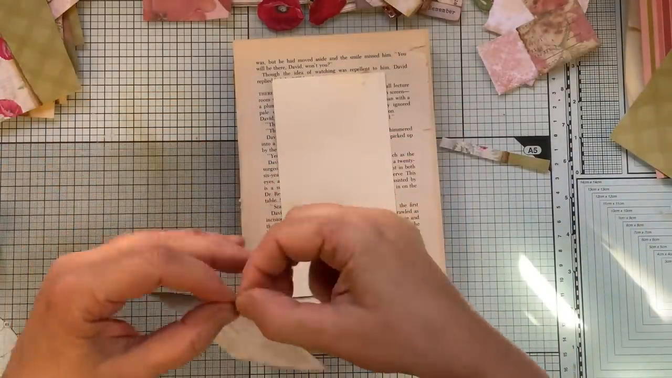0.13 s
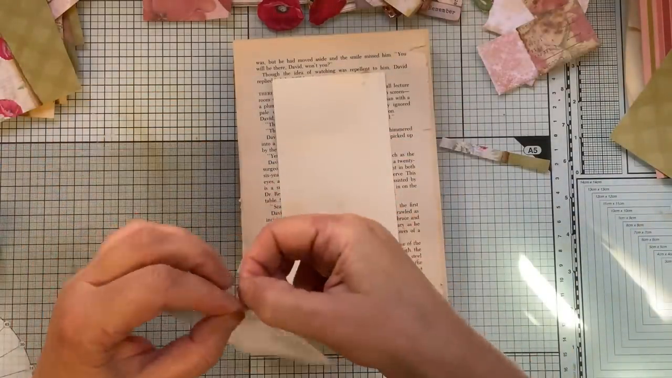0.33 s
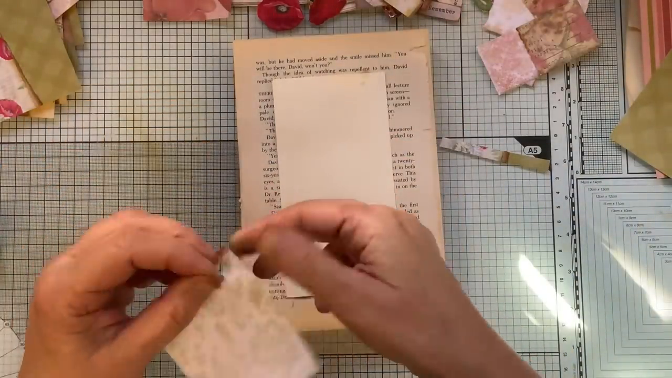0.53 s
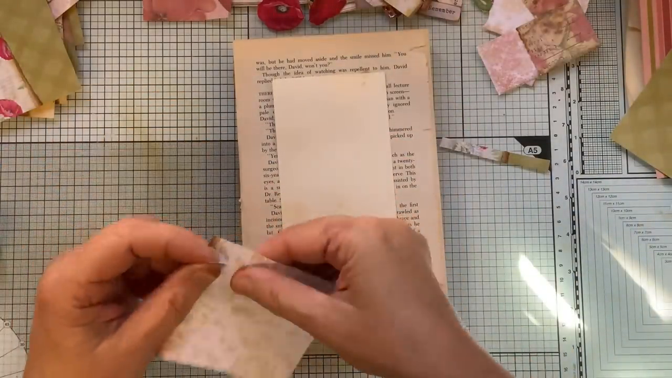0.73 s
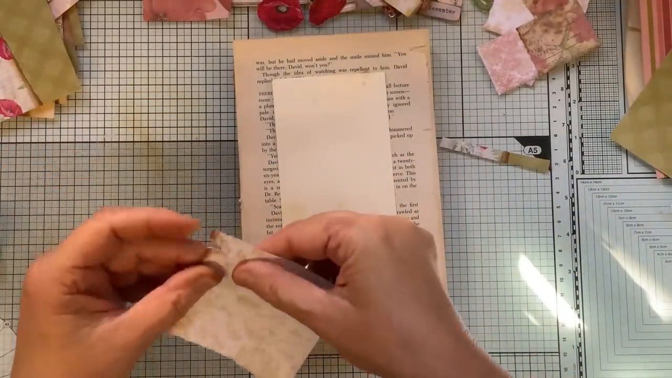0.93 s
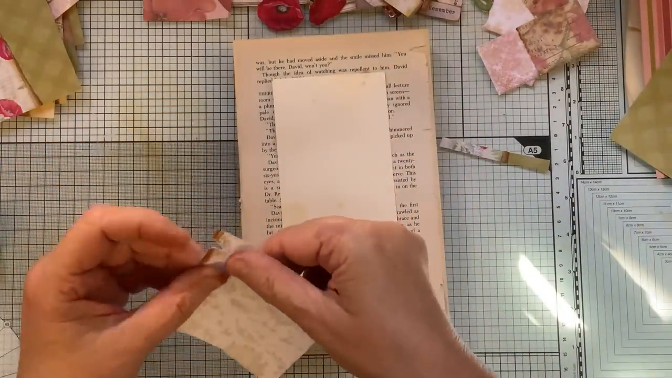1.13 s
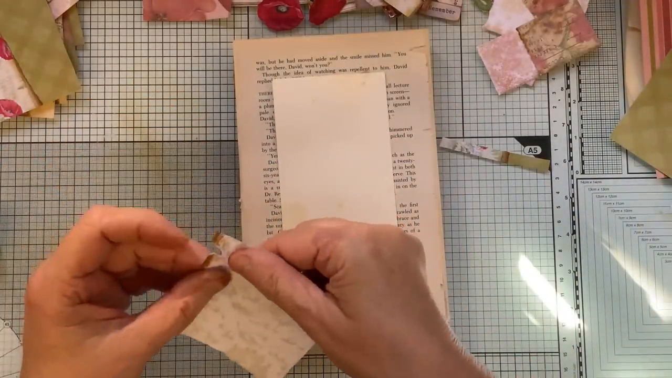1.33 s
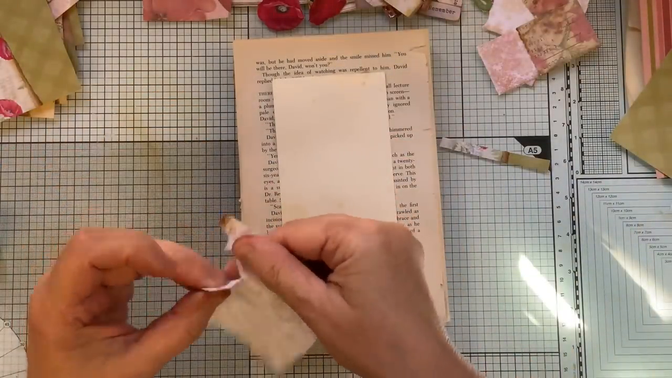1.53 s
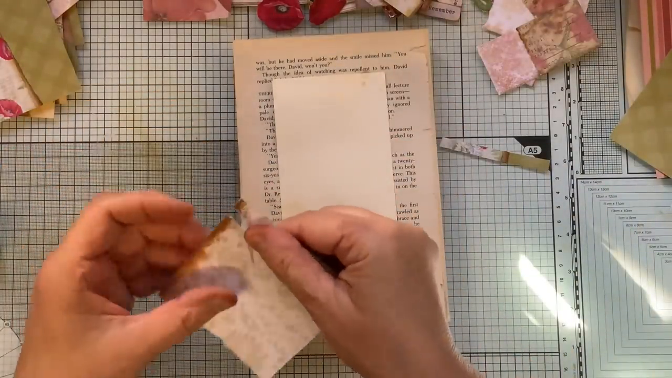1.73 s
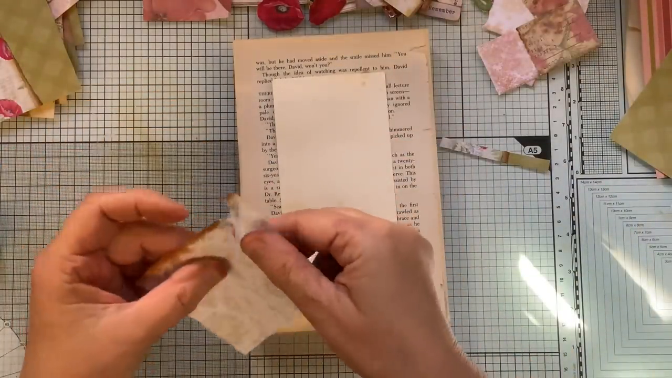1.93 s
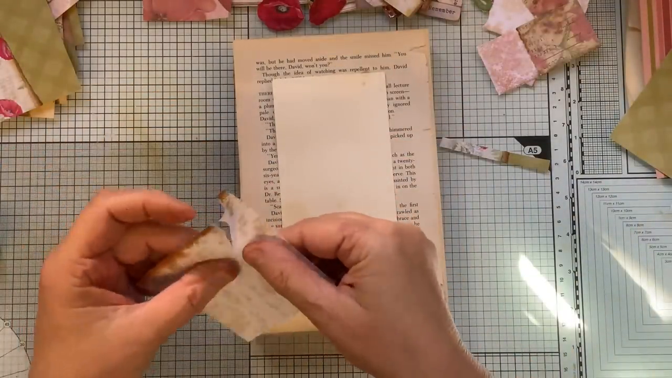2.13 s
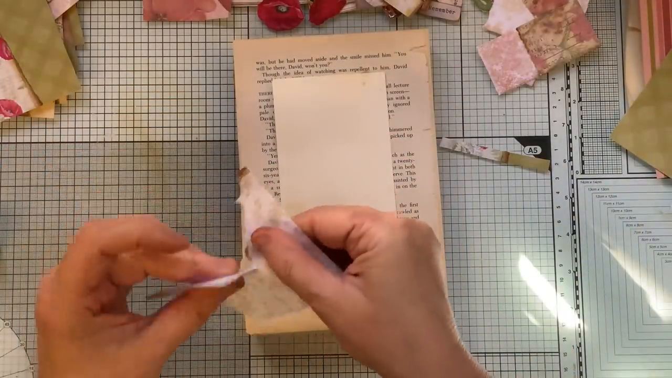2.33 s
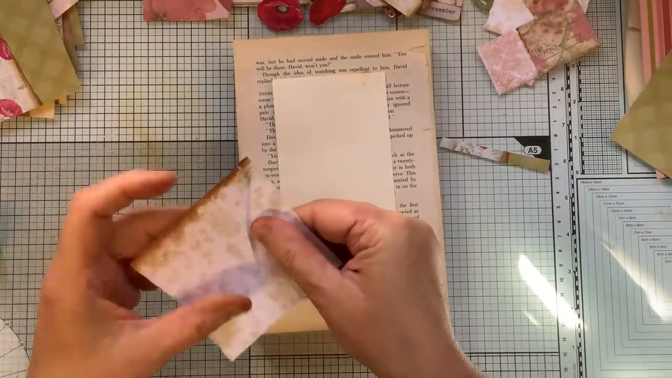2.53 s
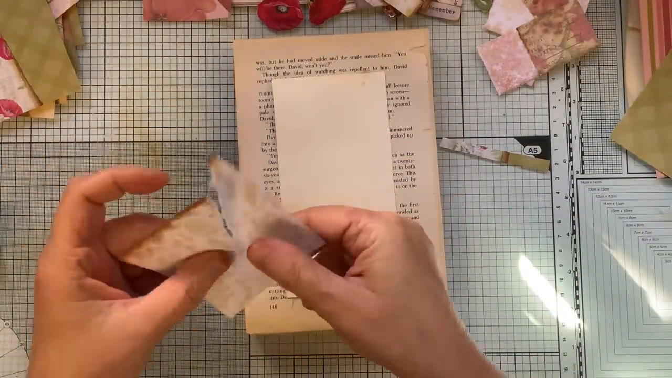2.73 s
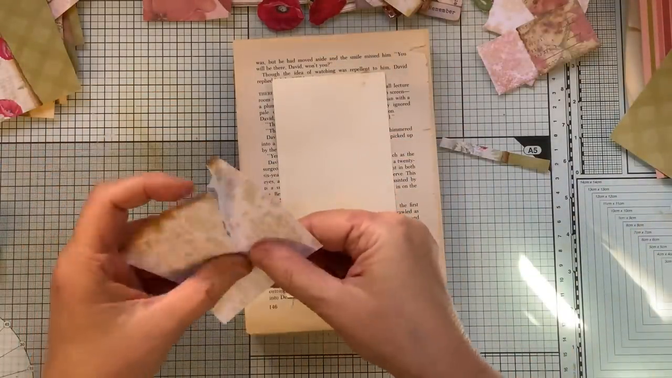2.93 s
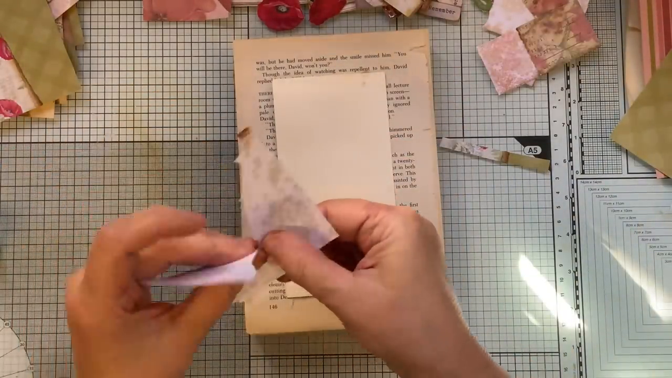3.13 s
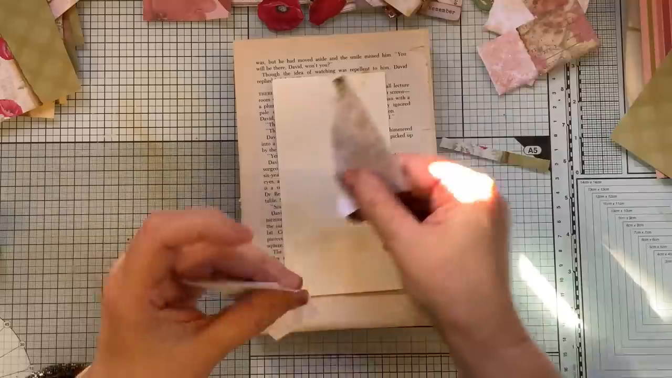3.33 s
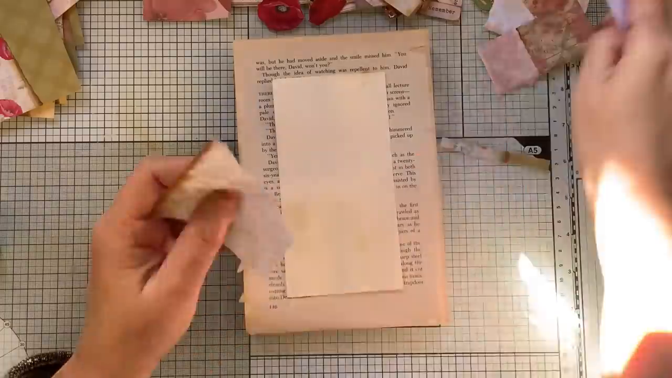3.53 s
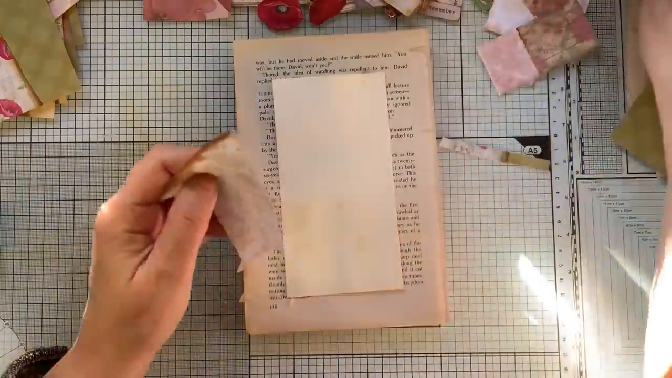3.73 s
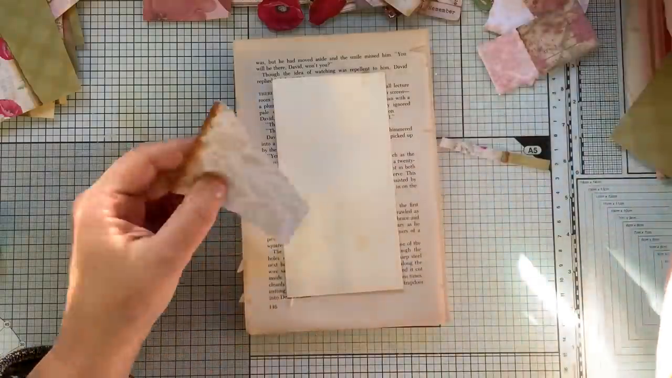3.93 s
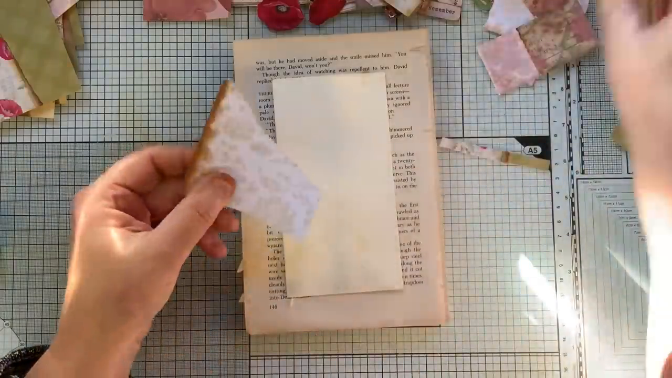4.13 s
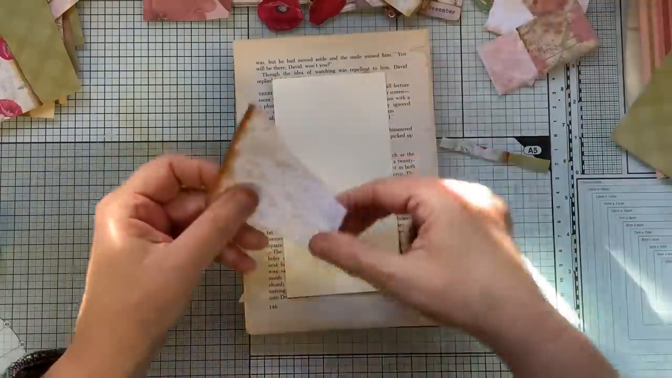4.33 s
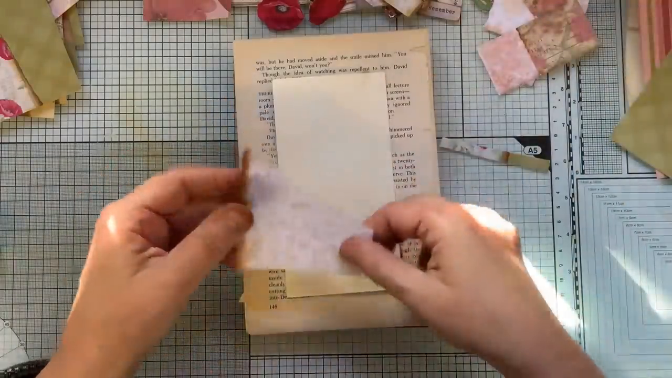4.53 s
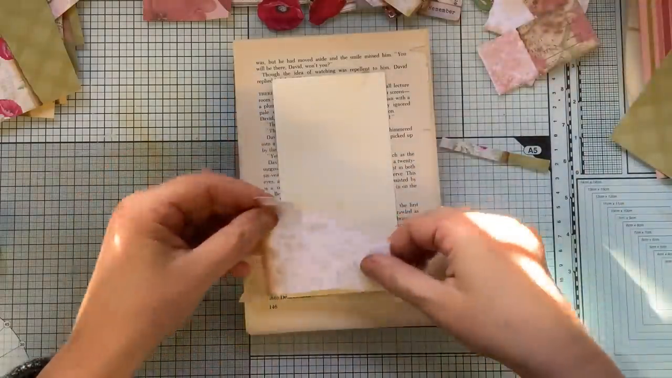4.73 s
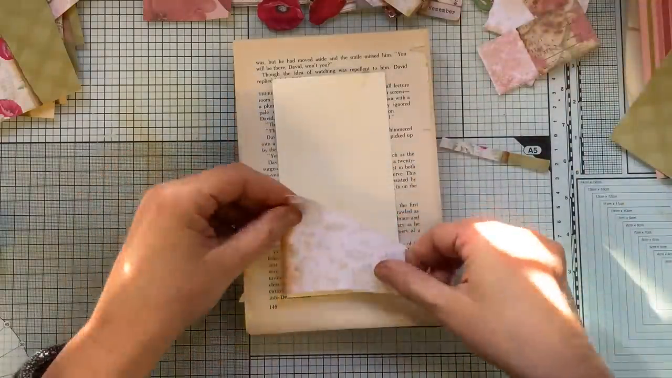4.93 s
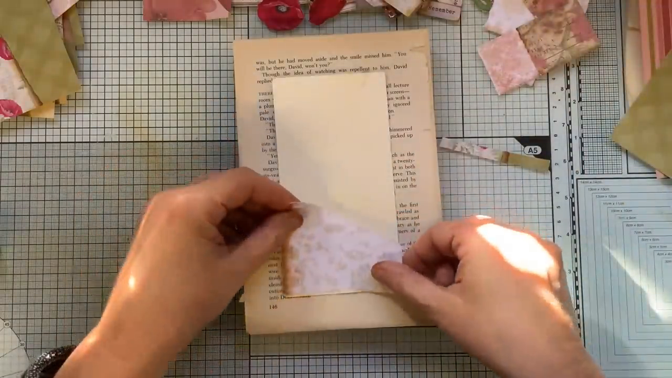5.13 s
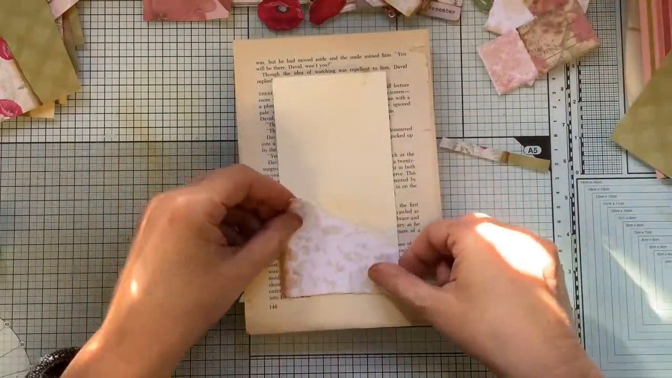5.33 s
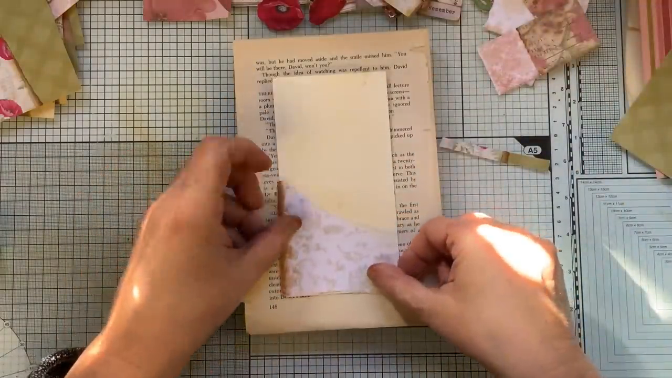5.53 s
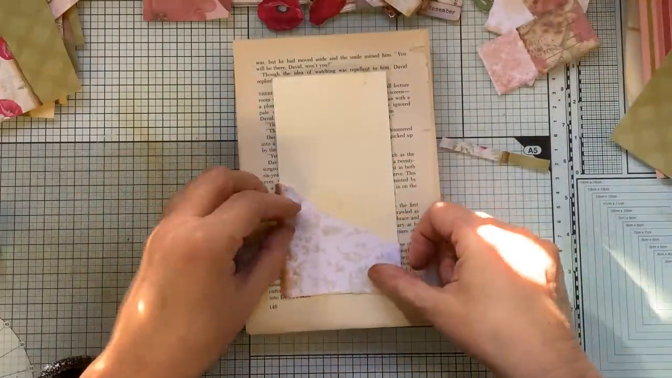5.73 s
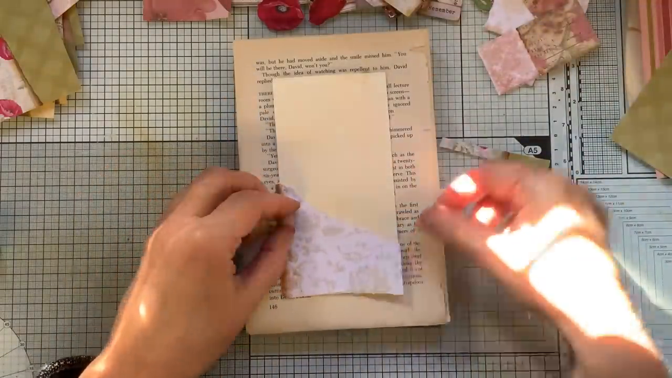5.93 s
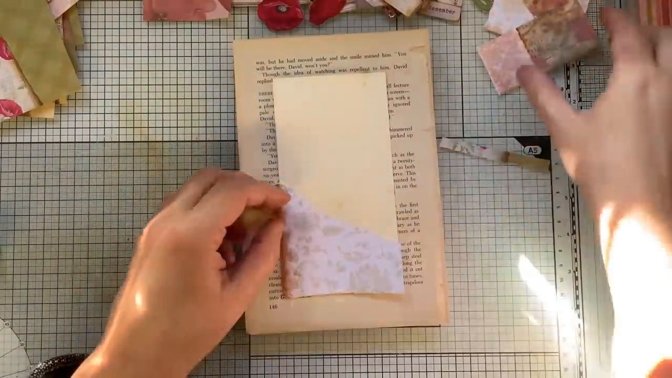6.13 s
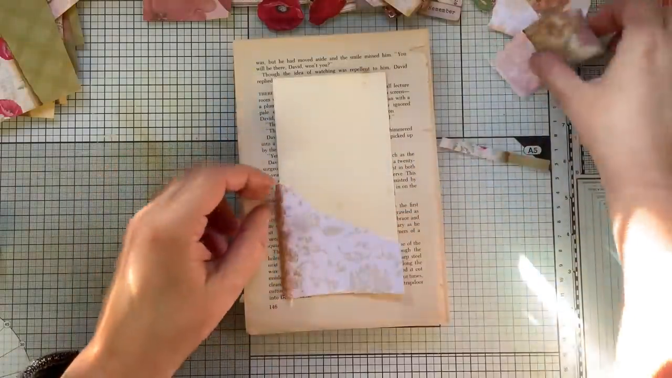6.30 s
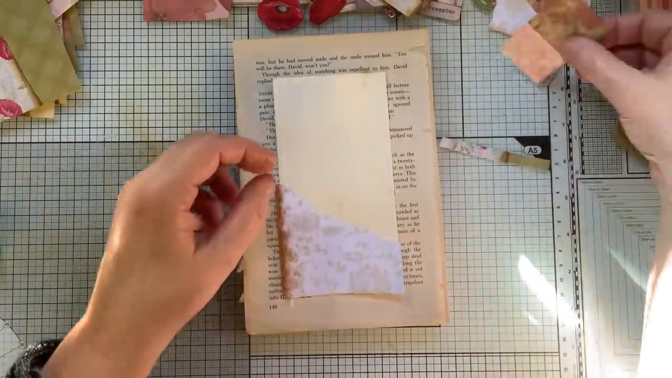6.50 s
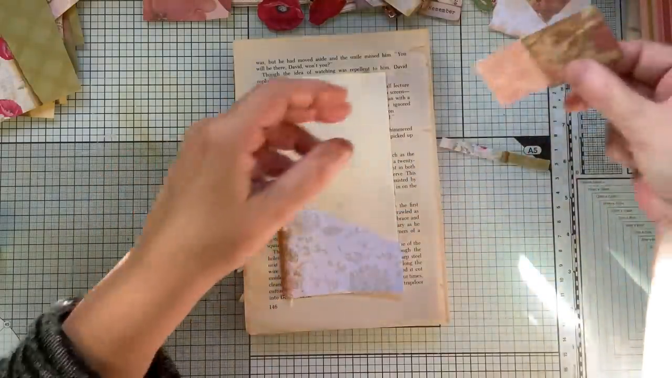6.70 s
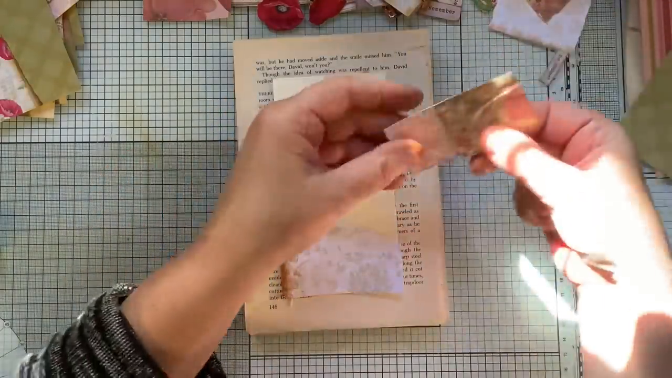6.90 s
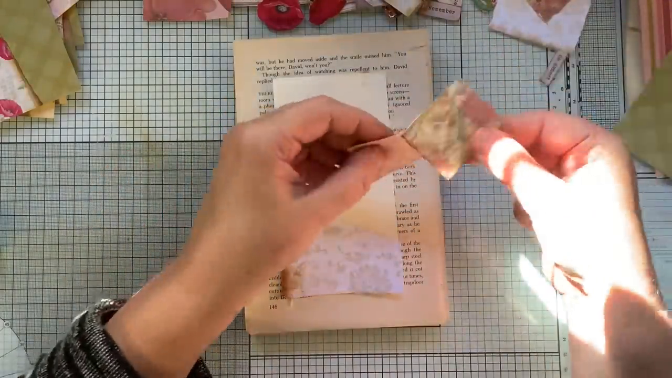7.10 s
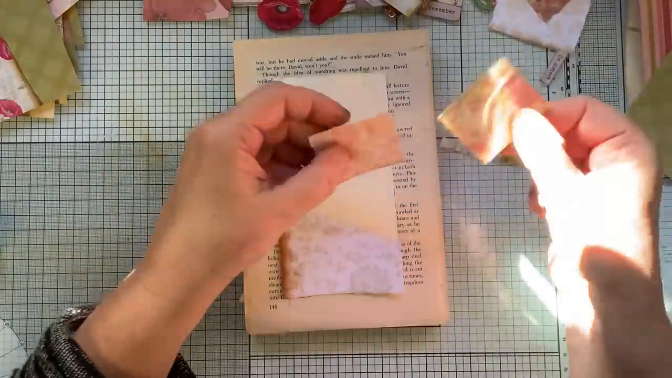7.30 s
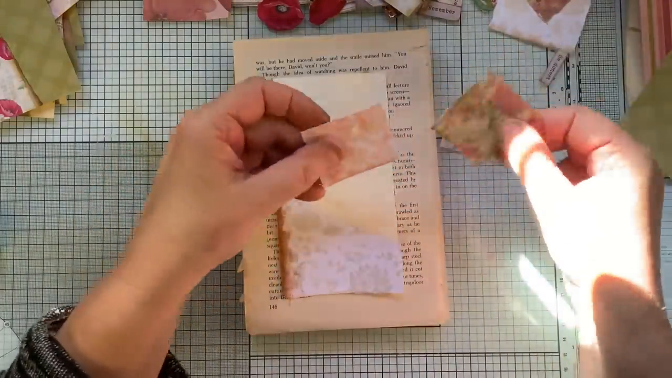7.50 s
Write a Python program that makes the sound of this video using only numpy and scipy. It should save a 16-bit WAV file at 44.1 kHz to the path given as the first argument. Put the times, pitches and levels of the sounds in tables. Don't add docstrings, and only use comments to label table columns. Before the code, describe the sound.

Thin paper torn by hand in short crisp rips with popping, rustling folds, then quiet scrap handling and low table bumps over a faint hum.

```python
import sys
import numpy as np
from scipy import signal
from scipy.fft import rfft, irfft, next_fast_len
from scipy.io import wavfile
from scipy.ndimage import uniform_filter1d

SR = 44100
rng = np.random.default_rng(int(sys.argv[2]) if len(sys.argv) > 2 else 0)


def master(y):
    cut = np.clip(np.atleast_2d(y).T, -1, 1)
    pcm = np.round(cut * 32767)
    wavfile.write(sys.argv[1], SR, pcm.astype(np.int16))


def volts_from_db(level):
    exponent = np.asarray(level, float) / 20
    return 10 ** exponent


N = 333396
SIZE = next_fast_len(N)
HZ = np.maximum(np.arange(SIZE // 2 + 1) * SR / SIZE, 1)


def curve(table):
    s, *columns = np.transpose(table)
    return [np.interp(np.arange(N) / SR, s, column) for column in columns]


def over_hz(table):
    hz, value = np.transpose(table)
    return np.interp(np.log(HZ), np.log(np.maximum(hz, 1)), value)


def shape(x, gain):
    return irfft(rfft(x, SIZE) * gain, SIZE)[..., :N]


def unit(x):
    return x / np.sqrt(np.mean(x ** 2))


def walk(rate):
    hold = max(int(SR / rate), 40)
    levels = rng.standard_normal(N // 20)[np.arange(N) // hold]
    return 1.2 * uniform_filter1d(levels, hold)


def room_tone():
    # time in seconds, hum in dB, room rumble in dB.
    hum_levels = [
        (0.0, -67, -80),
        (0.55, -70.5, -70.5),
        (0.95, -70.5, -73),
        (2.59, -68, -65),
        (3.81, -70, -72.5),
        (6.55, -70, -73),
        (7.56, -64, -60),
    ]
    # pitch in Hz, width in Hz, level in dB.
    hum_parts = [(54.4, 21, -3.5), (79, 130, -9), (98, 24, 0.7), (200, 9.9, -15)]
    # pitch in Hz, level in dB.
    room_colour = [(120, 10.5), (300, 0.5), (600, -36.5), (1500, -21), (4000, -23), (9000, -32),
                   (15000, -24)]
    hum_db, rumble_db = curve(hum_levels)
    hum = np.zeros(N)
    for hz, width, db in hum_parts:
        resonance = 1 / (1 + (2 * (HZ - hz) / width) ** 2)
        hum += volts_from_db(db) * unit(shape(rng.standard_normal(N), resonance))
    wavering_hz = 110.0 + 1.5 * walk(5.6)
    hum += volts_from_db(-2.5) * np.sin(2 * np.pi * np.cumsum(wavering_hz) / SR)
    air_gain = volts_from_db(over_hz(room_colour)) / (1 + (120 / HZ) ** 4)
    air = unit(shape(rng.standard_normal(N), air_gain))
    return volts_from_db(hum_db + 5.5) * hum + volts_from_db(rumble_db - 1.0 + 4.1 * walk(2.8)) * air


def knocks(table, rise_s, bend=0):
    out = np.zeros(N)
    t = np.arange(int(.3 * SR)) / SR
    for s, db, hz, t60 in table:
        i = int(s * SR)
        turns = hz * (t + bend * .006 * (1 - np.exp(-t / .006)))
        ring = np.sin(2 * np.pi * turns)
        out[i:i + len(t)] += volts_from_db(db - 60 * t / t60) * (1 - np.exp(-t / rise_s)) * ring
    return out


def table_bumps():
    # start in seconds, peak in dB, pitch in Hz, t60 in seconds.
    bumps = [(4.085, -43, 360, 0.053), (4.29, -44, 142.6, 0.085), (4.72, -56, 264, 0.12),
             (5.965, -48.5, 272, 0.093), (6.095, -40, 200, .06), (6.118, -27.5, 74, 0.1),
             (6.145, -33.5, 59, 0.2), (6.222, -27.5, 353, 0.025), (6.23, -26.5, 85.3, 0.077),
             (6.228, -31.5, 227, 0.063), (6.825, -39, 260, 0.04), (7.027, -25.5, 158, 0.156),
             (7.027, -27.5, 71, 0.1), (7.028, -26, 303, 0.18), (7.075, -24.5, 122, 0.063),
             (7.102, -21.5, 287, 0.027), (7.11, -31, 83, 0.11)]
    return knocks(bumps, rise_s=0.00156)


def hard_taps():
    # start in seconds, peak in dB, pitch in Hz, t60 in seconds.
    taps = [
        (4.0358, -26.5, 3044, 0.03),
        (5.0597, -23.5, 1500, 0.0086),
        (5.0598, -31, 3050, 0.007),
        (6.232, -25, 1430, 0.05),
        (7.072, -27.5, 1536, 0.028),
        (7.074, -22, 2248, 0.038),
    ]
    return knocks(taps, rise_s=0.0003)


def drags(table, skew, grip_db, grip_rate):
    out, noise, grip = np.zeros(N), rng.standard_normal(N), volts_from_db(grip_db * walk(grip_rate))
    lead = 400
    for s, length, hz, width, db in table:
        i, samples = int(s * SR), max(length, .005) * SR
        part = (np.arange(int(samples)) / samples)[:N - i]
        end = i + len(part)
        ring = signal.iirpeak(hz, hz / max(width, 50), fs=SR)
        rub = signal.lfilter(*ring, noise[i - lead:end])
        rub = signal.lfilter(*ring, rub)[lead:]
        out[i:end] += volts_from_db(db) * np.sin(np.pi * part ** skew) * unit(rub) * grip[i:end]
    return out


def mat_drags():
    # start in seconds, length in seconds, pitch in Hz, width in Hz, level in dB.
    slides = [
        (3.996, 0.6, 345, 200, -65),
        (4.737, .1, 3320, 1500, -52),
        (7.087, 0.51, 306, 172, -56.5),
        (7.097, 0.35, 2264, 440, -55.5),
        (7.43, 0.12, 3500, 1800, -55.5),
    ]
    return drags(slides, skew=0.41, grip_db=1.72, grip_rate=30)


def singing_edges():
    # start in seconds, length in seconds, pitch in Hz, width in Hz, level in dB.
    edges = [(.275, .07, 9900, 3006, -36.5), (.305, 0.037, 6770, 2000, -32),
             (1.322, 0.066, 3080, 700, -39.5), (1.322, 0.02, 7500, 3000, -33.5),
             (1.378, 0.11, 3190, 700, -32.5), (1.388, 0.033, 4350, 900, -29.5),
             (1.405, 0.064, 8100, 1301, -27), (1.41, 0.036, 5830, 1200, -31),
             (2.155, 0.034, 7200, 2500, -38), (2.185, .02, 9800, 1496, -30),
             (2.222, 0.045, 7400, 2500, -20.5), (2.271, 0.011, 7030, 1992, -17),
             (2.995, 0.023, 3200, 800, -34.5), (2.99, 0.037, 7500, 3015, -34.5),
             (3.092, 0.049, 6500, 2500, -22.5), (3.137, .018, 6300, 2990, -24),
             (3.59, 0.11, 6000, 3030, -47), (3.4, 0.062, 8500, 3000, -43.5),
             (4.315, 0.027, 6500, 2500, -48.5), (5.05, 0.1, 6060, 2500, -51),
             (7.44, 0.081, 6940, 2000, -57)]
    return drags(edges, skew=0.52, grip_db=3.0, grip_rate=400)


def sheet_pops():
    # start in seconds, peak in dB, pitch in Hz, t60 in seconds.
    pops = [(.187, -50, 490, 0.075), (.287, -33, 597, 0.053), (.317, -36, 429, 0.093),
            (.381, -28.5, 499, 0.055), (.4175, -23.5, 414, 0.059), (.418, -27.5, 627, 0.043),
            (.519, -43, 460, 0.11), (.535, -42.5, 517, .08), (.645, -34.5, 510, 0.067),
            (.686, -27.5, 567, 0.049), (.712, -29, 466, 0.053), (.725, -32.5, 438, 0.051),
            (1.332, -41, 468, .08), (1.381, -38, 733, 0.074), (1.424, -31, 519, 0.09),
            (1.441, -28, 437, 0.076), (1.51, -48, 570, 0.032), (1.538, -26.5, 392, 0.061),
            (1.675, -40, 465, 0.083), (1.774, -37.5, 516, 0.047), (1.858, -40.5, 450, 0.1),
            (2.052, -50, 468, 0.055), (2.177, -32.5, 710, 0.046), (2.23, -30, 630, 0.066),
            (2.249, -27, 565, 0.083), (2.266, -26.5, 717, 0.038), (2.359, -34.5, 410, 0.071),
            (2.413, -36, 455, 0.047), (2.512, -34, 1260, 0.025), (2.53, -42, 573, 0.031),
            (2.555, -45, 475, 0.048), (2.575, -36, 480, 0.061), (2.595, -42, 318, .07),
            (2.974, -36, 904, 0.034), (3.138, -31.5, 1467, 0.028), (3.147, -23, 999, 0.035),
            (3.152, -33, 604, 0.038), (3.345, -30.5, 1320, 0.048), (3.356, -38, 490, 0.046),
            (3.377, -29.5, 515, 0.075), (4.278, -43.5, 894, 0.045), (4.3, -44, 652, 0.049),
            (6.932, -36.5, 930, .03), (7.072, -28, 784, 0.044)]
    return knocks(pops, rise_s=0.0018, bend=.3)


def paper_noise(patchy_db=3.5, patchy_rate=18):
    # pitch in Hz, level in dB.
    paper_colour = [(150, -1.5), (300, -2), (450, 4.5), (800, -6.5), (1400, -2), (2400, -0.5), (3500, -1.5),
                    (5500, 0), (8000, 2), (11000, 3), (14000, 2.5), (15800, -3.5)]
    # pitch in Hz, level in dB.
    port_apart = [(100, -20), (350, -12), (650, 0), (1500, -6), (2200, -26), (2650, -26), (3000, -10),
                  (3600, -30), (4500, -28), (5500, -8), (10500, -6), (11900, -12), (12500, -46)]
    # low edge in Hz, high edge in Hz.
    band_edges = [(2200, 7500), (7500, 17000), (850, 2200), (150, 850)]
    colour, apart = volts_from_db(over_hz(paper_colour)), volts_from_db(over_hz(port_apart))
    out = []
    for low, high in band_edges:
        splits, total = np.geomspace(low, high, num=4), 0
        for a, b in zip(splits, splits[1:]):
            shared, *own = rng.standard_normal((3, len(HZ), 2)) @ [1, 1j]
            gain = colour / np.sqrt((1 + (a / HZ) ** 16) * (1 + (HZ / b) ** 16))
            patch = irfft(gain * (shared + apart * np.array(own)), SIZE)[:, :N]
            patchiness_db = patchy_db * min(b / 3000, 1)
            total = total + volts_from_db(patchiness_db * walk(patchy_rate)) * patch
        out.append(unit(total))
    return out


def stroke(t, s, length, start_db, end_db, attack, release, tone):
    attack, length, release = np.maximum([attack, length, release], 1e-3)
    times = [s - 5 * attack, s, s + length, s + length + 5 * release]
    db = np.interp(t, times, [start_db - 100, start_db, end_db, end_db - 100])
    return volts_from_db(db + np.array([0, *tone])[:, None]) ** 2


def pulls(t, table, attack, tone):
    return sum(stroke(t, s, length, start_db, end_db, attack, release, tone)
               for s, length, start_db, end_db, release in table)


def bends(t, table, fine, body):
    power = 0
    for s, rise, fall, db, flap in table:
        tone = (fine, body + 0.48 * flap, flap)
        power = power + stroke(t, s, 0, db, db, rise, fall, tone)
    return power


def nudges(t):
    # peak in seconds, swelling and dying in seconds per 20 dB, peak in dB, flapping in dB.
    nudged = [(3.46, 0.78, 0.1, -44.5, -36.5), (3.636, 0.26, 0.13, -45, -22.5),
              (3.74, 0.35, 0.21, -47, -26.5), (3.9, 0.2, 0.35, -55.5, -19), (4.3, .05, 0.14, -63.5, 7.5),
              (4.44, .1, 0.2, -64, -15), (4.513, 0.004, 0.09, -56.5, -6), (4.878, 0.13, 0.52, -62, -20),
              (5.368, 0.14, 0.0348, -50, -30.5), (5.484, 0.0546, 0.0231, -43, -18),
              (5.58, 0.47, 0.035, -60, -13), (5.959, 0.03, 0.03, -68, 7.5), (6.094, -0.13, 0.02, -69, 22),
              (6.195, 0.09, 0.0757, -48, -13), (6.23, -0.1, 0.0776, -37.5, -8.5),
              (6.62, .5, 0.2, -63.5, -3.5), (6.826, 0.03, 0.03, -66, 10.5), (7.024, 0, 0.25, -51.5, -2.5),
              (7.072, 0.01, 0.15, -48.5, -3.5)]
    return bends(t, nudged, fine=0, body=0)


def rustles(t):
    # peak in seconds, swelling and dying in seconds per 20 dB, peak in dB, flapping in dB.
    turns = [(0.0, .01, 0.04, -65.5, 16), (.185, 0.01, 0.22, -47, -6), (.403, 0.04, 0.02, -36.5, -4),
             (.422, 0, 0.0439, -43.5, 7), (.519, 0.04, 0.07, -50, 4), (.635, 0, 0.16, -52.5, 10.5),
             (.698, 0.0238, 0.1, -47, 11), (.738, 0.29, -0.3, -54, -10), (.3, 0.0256, 0.05, -48, 12),
             (.878, 0.06, 0.24, -49.5, -14.5), (1.128, 0.04, 0, -47, -23), (1.19, 0.5, -0.2, -58.5, -15),
             (1.478, 0.17, 0.04, -38, -17), (1.545, 0.11, 0.07, -51.5, 7), (1.866, 0.31, 0.04, -47, -5.5),
             (1.892, .01, 0.08, -46, 0), (1.949, 0.004, 0.25, -49.5, -20), (2.09, 0.06, 0.27, -49, -25),
             (2.285, -0.04, 0.07, -43.5, -4.5), (2.368, 0.01, 0.0355, -42, 1),
             (2.42, 0.09, 0.54, -62.5, 11.5), (2.59, 0.08, 0.03, -41, -0.5),
             (2.994, 0.0271, 0.0954, -31, -14), (3.388, 0.1352, 0, -39, -6.5)]
    return bends(t, turns, fine=1.5, body=-3)


def scrapes(t):
    # start in seconds, length in seconds, start in dB, end in dB, dying in seconds per 20 dB.
    rubs = [(0.789, 0.038, -46, -49, -0.12), (2.483, 0.014, -46, -44, 0.06),
            (4.551, .013, -54.5, -57.5, 0.1), (7.391, 0.086, -64.5, -48.5, -0.03),
            (6.825, 0.087, -57, -54, 0.15), (1.667, 0.058, -48.5, -44.5, 0.04), (4.738, 0.08, -56, -59, 0),
            (5.675, 0.081, -66.5, -72, -1.7), (2.714, 0.064, -50, -47, 0.14), (3.1, 0.091, -58.5, -63, 0.3),
            (4.035, 0.16, -56.5, -64.5, 0), (4.274, 0.119, -51, -46.5, 0), (4.614, 0.05, -51.5, -55, 0.08),
            (4.997, 0.08, -48.5, -47, 0.14), (6.3, 0.1, -58, -60, -0.26)]
    return pulls(t, rubs, attack=0.0069, tone=(0, -10.5, -21))


def rips(t):
    # start in seconds, length in seconds, start in dB, end in dB, dying in seconds per 20 dB.
    tears = [
        (.27, 0.046, -46.5, -30.5, 0.05),
        (1.323, 0.041, -35, -33, 0),
        (1.378, 0.074, -32, -24, 0.0182),
        (2.175, 0.04, -28, -25.5, 0.03),
        (2.223, 0.046, -24, -27, 0.0245),
        (3.074, 0.076, -35.5, -27, 0.02),
    ]
    return pulls(t, tears, attack=0.01, tone=(3.8, -13.5, -16))


def handling():
    # crackle, fine hiss, body, flapping in dB.
    rest_db = (-87, -83, -86, -86)
    # time in seconds, lift of the fine hiss in dB.
    facing = [(0.0, 1.5), (.35, 6), (.42, -3.5), (.8, -0.5), (1.3, 3), (1.5, -0.5), (2.15, 2.5), (2.6, -3),
              (3.1, 6.5), (3.9, 5), (4.4, 1), (4.6, -3.5), (5.2, -6.5), (5.38, 2), (5.5, 0.5), (6.4, 2),
              (7.0, -4.5), (7.56, 6)]
    t = np.arange(0, N + 32, 32) / SR
    power = volts_from_db(np.array(rest_db)[:, None] + 0 * t) ** 2
    power = power + rips(t) + scrapes(t) + rustles(t) + nudges(t)
    levels = curve(np.vstack([t, 10 * np.log10(power)]).T)
    levels[1] = levels[1] + curve(facing)[0]
    return levels


def fibre_snaps(rate, spread_db, t60, slip_db, slip_rate):
    when, size = rng.random(N) < rate / SR, rng.exponential(size=N)
    impulses = when * volts_from_db(np.minimum(spread_db * size, 20))
    tails = signal.lfilter([1], [1, -1000 ** (-1 / (t60 * SR))], impulses)
    envelope = tails * volts_from_db(slip_db * walk(slip_rate))
    return envelope / np.sqrt(uniform_filter1d(envelope ** 2, size=3000) + 1e-9)


def rustle(noise):
    band_trim = [0.076, 0.21, -0.28, -0.3]
    levels = handling()
    grain = .62
    fibres = fibre_snaps(1500, 4.0, .006, .8, 90) ** grain
    flaps = fibre_snaps(150, 3.5, .04, 1.5, 30) ** grain
    hiss_drive = np.sqrt(fibres * np.roll(fibres, SR))
    drives = [fibres, hiss_drive, np.sqrt(fibres * flaps), flaps]
    return sum(volts_from_db(db + trim) * drive * n for db, trim, drive, n in zip(levels, band_trim, drives, noise))


def bursts(table, t60, noise, gain_db=-8, flap_db=-7, bass_stretch=1.69):
    out = np.zeros((2, N))
    for s, db, fine, body in table:
        i = int(s * SR)
        t = np.arange(min(int(.15 * SR), N - i)) / SR
        end = i + len(t)
        tick = (.85 + 1.6 * np.exp(-t / .0013)) * np.minimum(t / .0009, 1)
        band_db = (0, fine, body, body + flap_db)
        for n, rel, slow in zip(noise, band_db, (1, 1, bass_stretch, bass_stretch)):
            decay = volts_from_db(db + rel + gain_db - 60 * t / (t60 * slow))
            out[:, i:end] += decay * tick * n[:, i:end] / np.std(n[:, i:i + 330])
    return out


def cracks(noise):
    # start in seconds, peak in dB, fine hiss in dB, body in dB.
    ticks = [(.4178, -13.5, 6, -24), (.632, -28, -5, -10), (.702, -12.5, -6, -7), (.7298, -37.5, 16, 8),
             (1.2685, -37, 12, -34), (1.2968, -25, -7, -7.5), (1.3585, -26, -7, -5), (1.4537, -7, 1, -21),
             (1.5463, -25, -7, -2), (2.1251, -35, -5, -32), (2.2712, -6, 2.5, -16), (2.3411, -25, 2, -16),
             (2.5863, -25, 0, -2.5), (3.0755, -20, 8, -37), (3.2485, -33, 0, -8.5),
             (4.0352, -19.5, -16, -6.5), (4.7396, -46.5, -27, -4), (5.3655, -34.5, 20.5, -32),
             (5.4796, -13, -17, -25), (6.139, -32, -1.5, -16), (6.2354, -7, -5, -13), (6.7945, -54, -3, 9),
             (6.9127, -35, 9.5, -31)]
    ringing_snaps = [(.2268, -40, 14, -16), (.5164, -44.5, 7.5, 4), (.686, -30, -28, 7.5),
                     (1.2322, -41.5, 3, -37), (1.2955, -21, 11.5, -35), (1.8939, -35, -10, 5.5),
                     (2.3585, -29.5, -3, -8), (2.4126, -24, -4, -5), (2.4595, -38, -1, -16),
                     (2.5274, -23.5, 7.5, -22), (2.6865, -34, 2, -6.5), (3.0924, -20, 13, -46),
                     (3.3561, -18, -6, -8), (3.3794, -9, -6.5, -9), (4.088, -45.5, -23, -2),
                     (4.2753, -27, -4, -6.5), (4.5106, -46, -27.5, 1.5), (5.8219, -52, -17.5, -26),
                     (6.1995, -25.5, -8, -10), (6.332, -43, 8, -28), (6.9315, -21.5, -7, -16.5)]
    crunches = [(.182, -46, 14.5, -21), (1.2186, -50, 14, -11), (1.5334, -24.5, -15, -5.5),
                (1.7729, -31.5, 0, -3), (1.8542, -31.5, -7, -4.5), (2.2235, -18, 3.5, -12),
                (2.716, -41.5, 13.5, -9.5), (3.1192, -21, 7, -42), (3.1439, -17, -7, 0.5),
                (5.0604, -44, -10, -2), (5.4735, -32.5, 13.5, -16), (6.167, -34.5, -3, -2.5),
                (6.2274, -19.5, 3, -11), (6.8192, -36.5, 4.5, -21.5), (7.0722, -19, -4, -5),
                (7.2591, -42.5, 1, -21)]
    bundles = [(.2638, -42, -2, -20), (.2943, -31, 5, -18), (.3027, -38, 5, -20), (.3187, -26, 3, -17),
               (1.289, -21, 6, -19), (1.3105, -27, 6.5, -29), (1.3228, -27.5, 0, -23),
               (1.3283, -27, 0, -21), (1.3772, -30, -2, -18), (1.3935, -20, -5, -15), (1.4215, -18, 0, -11),
               (1.4385, -16, -4, -20), (1.4435, -12, -3, -14), (2.1763, -22, 6, -30),
               (2.182, -23, 2.5, -32), (2.1915, -21, 0, -23.5), (2.2075, -20, 0, -20),
               (2.2155, -16.5, 0, -20), (2.2305, -12, 2, -20), (2.2395, -13, 0, -14), (2.246, -10, 0, -17),
               (2.252, -8, 3, -17), (2.258, -15, 0, -18), (2.9948, -30, 0, -18), (3.0035, -26, -2, -26.5),
               (3.021, -24.5, 0, -26.5), (3.051, -20, 2, -22), (3.1155, -20, 2, -22.5),
               (3.1215, -9.5, 4, -26), (3.1384, -19, 0, -17), (3.1465, -14, 0.5, -11),
               (3.8892, -45, -3, -20), (4.2704, -33, 1, -15), (4.3182, -41, 11, -17),
               (4.383, -38.5, -1, -23), (4.5497, -41, -8, -3), (4.9947, -41, 1, -18.5),
               (5.3374, -36, 2, -28.5), (6.158, -33, 0, -20), (6.3167, -42, 3, -25), (6.869, -41, 6, -22),
               (6.904, -47, 1, -22), (7.0236, -54, -10, -10.5), (7.079, -30, -6, -20),
               (7.3902, -56.5, -2, -4.5)]
    dry_cracks = bursts(ticks, 0.017, noise) + bursts(bundles, 0.013, noise)
    return dry_cracks + bursts(ringing_snaps, 0.026, noise) + bursts(crunches, .044, noise)


def near_echoes(paper):
    # delay in seconds, level in dB.
    echoes = [(.0013, -17), (.0023, -15), (.0037, -16), (.0053, -16)]
    comb = 1 + sum(volts_from_db(db) * np.exp(-2j * np.pi * HZ * s) for s, db in echoes)
    return shape(paper, comb / np.sqrt(np.mean(np.abs(comb) ** 2)))


def room_tail(near):
    t60_s, level_db = 0.088, -15.5
    t = np.arange(int(.4 * SR)) / SR
    tail = rng.standard_normal(len(t)) * volts_from_db(-60 * t / t60_s) * (t > .003)
    return volts_from_db(level_db) * shape(near, rfft(tail / np.linalg.norm(tail), SIZE))


def scene():
    noise = paper_noise()
    near = near_echoes(rustle(noise) + cracks(noise))
    near = near + mat_drags() + singing_edges() + sheet_pops() + table_bumps() + hard_taps()
    return near + room_tail(near) + room_tone()


def band_limit(x):
    return signal.sosfilt(signal.butter(12, 16670, fs=SR, output="sos"), x)


def record(dry):
    # pitch in Hz, radians by which the left port leads.
    port_phase = [(0, 0), (100, -.18), (600, -.5), (950, .2), (1250, 0), (1750, .95), (1980, 1.9),
                  (2200, 3.05), (2620, 3.25), (3050, 5.4), (3500, 6.28), (4600, 6.3), (5400, 6.85),
                  (8000, 7.3), (10400, 8), (12650, 9.425), (16500, 9.425)]
    # pitch in Hz, left minus right in dB.
    port_balance = [(60, .6), (150, .2), (350, -4), (650, -9), (900, -2), (1400, 2), (2100, 0), (15000, 0)]
    # start in seconds, length in seconds.
    alike_spans = [(.255, .04), (.325, .042), (.412, .01), (.72, .09), (1.22, .02), (1.288, .016), (1.438, .04),
                   (1.51, .04), (2.35, .03), (2.408, .008), (2.458, .015), (2.56, .05), (2.96, .05), (3.07, .012),
                   (3.35, .03), (4.032, .012), (5.33, .03), (6.14, .02), (6.22, .02), (6.91, .025)]
    side = np.array([[1], [-1]])
    ports = volts_from_db(side * over_hz(port_balance) / 2) * np.exp(.5j * side * over_hz(port_phase))
    cut = 1 / (1 + (HZ / 15800) ** 300) / (1 + (48 / HZ) ** 6)
    t = np.arange(N) / SR
    alike_gate = sum((t > s) * (t < s + length) * 1. for s, length in alike_spans)
    alike_gate = uniform_filter1d(alike_gate, size=200)
    sway = volts_from_db(-20.5 + 13 * walk(9))
    moved = (np.abs(t - 4.45) < .5) * volts_from_db(-12)
    cancelled = (HZ > 12300) + .4 * (np.abs(HZ - 2420) < 330)
    heard = shape(dry, ports * cut)
    heard = heard + shape(volts_from_db(-15.5) * alike_gate * dry[0], cut * cancelled)
    heard = heard + shape(sway * dry[0], np.exp(-((HZ - 12200) / 450) ** 2))
    heard = heard + shape(moved * dry[0], np.abs(HZ - 2220) < 170)
    return band_limit(np.clip(heard, -1, 1))


dry = scene()
out = record(dry)
master(out)
```